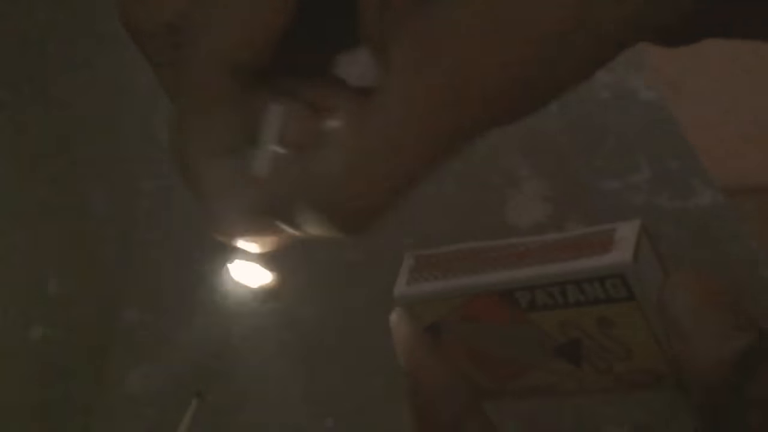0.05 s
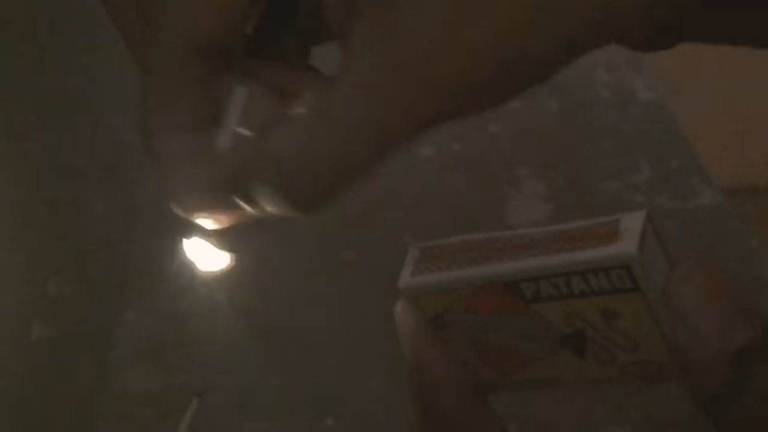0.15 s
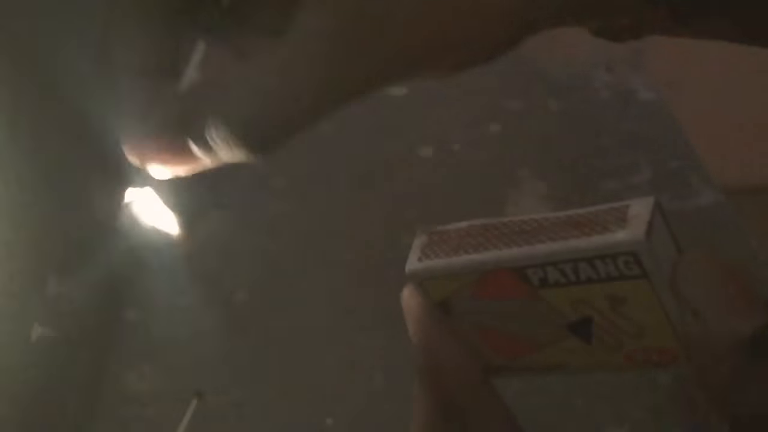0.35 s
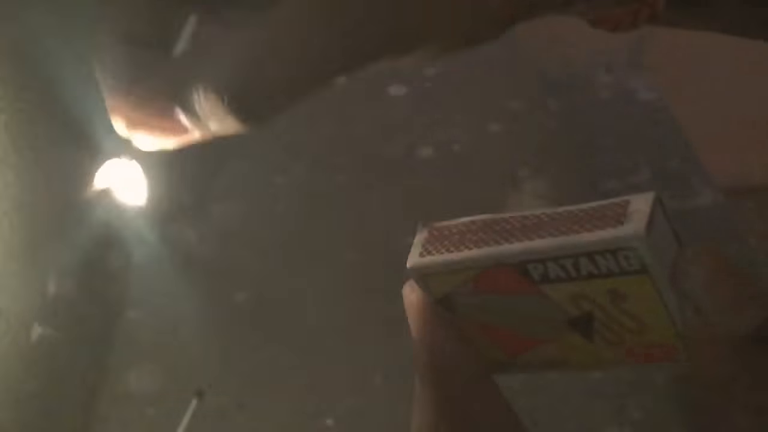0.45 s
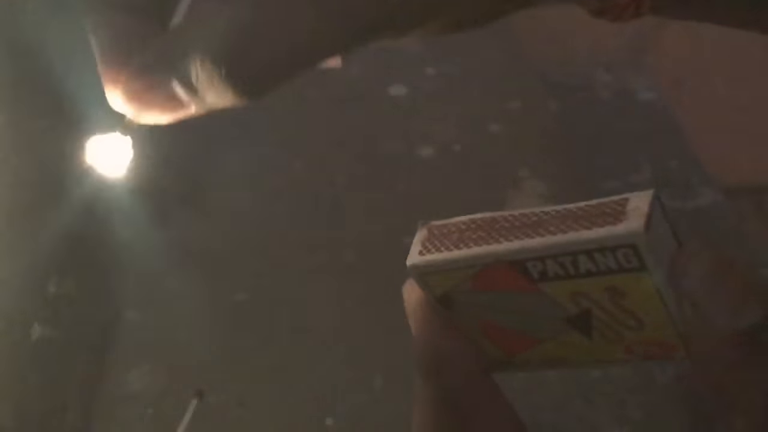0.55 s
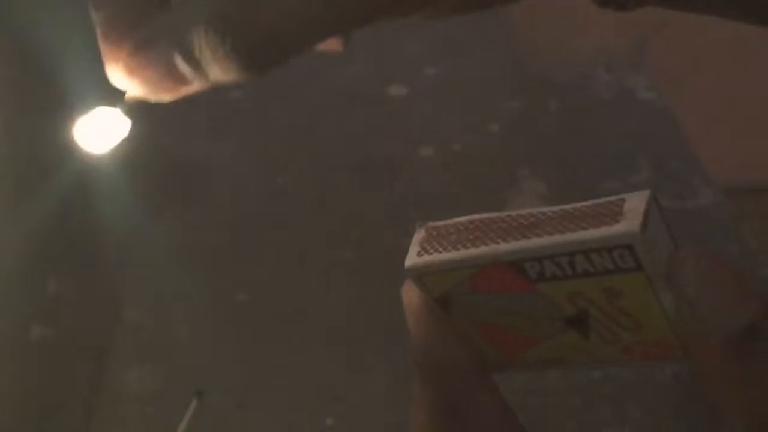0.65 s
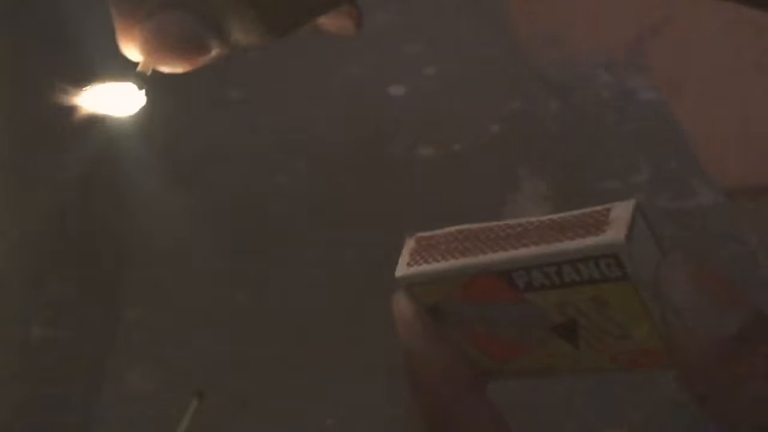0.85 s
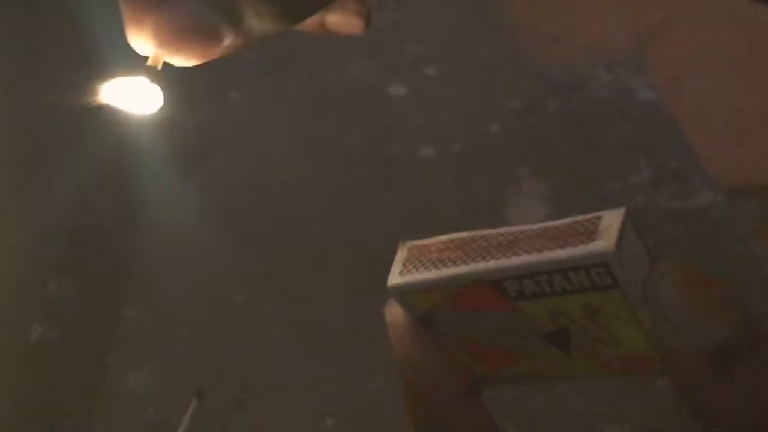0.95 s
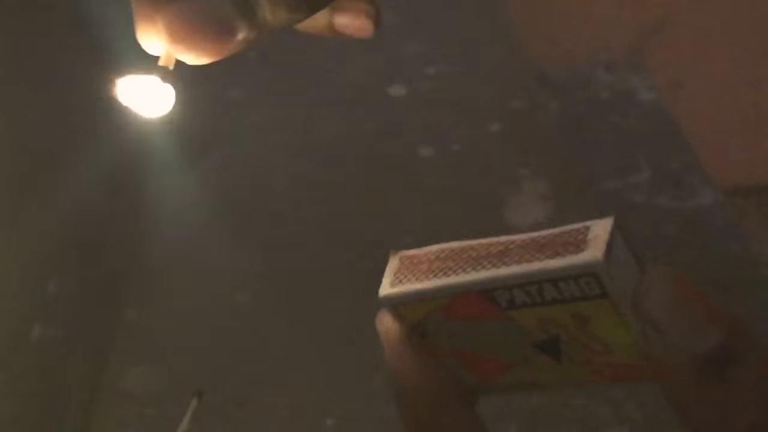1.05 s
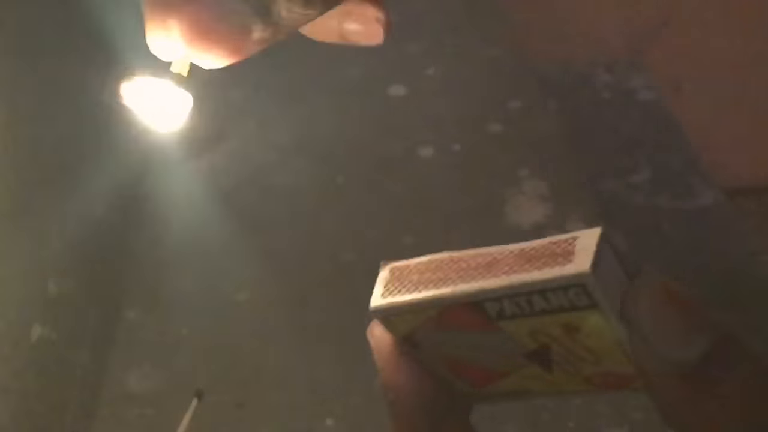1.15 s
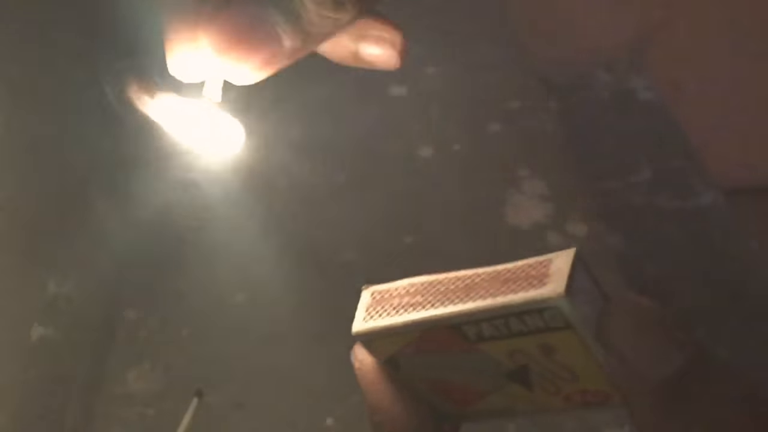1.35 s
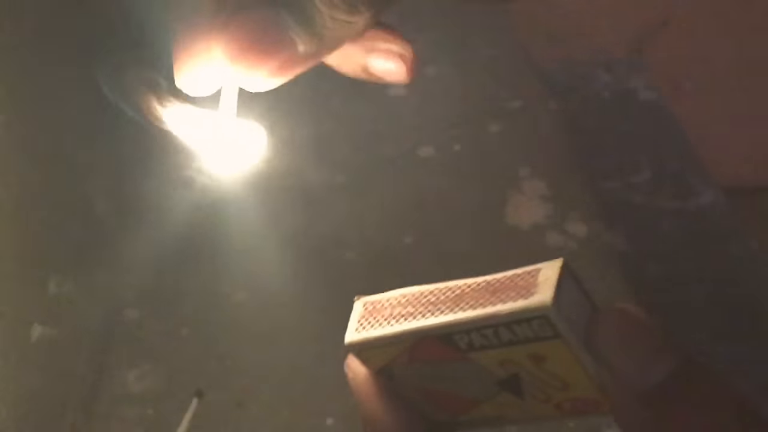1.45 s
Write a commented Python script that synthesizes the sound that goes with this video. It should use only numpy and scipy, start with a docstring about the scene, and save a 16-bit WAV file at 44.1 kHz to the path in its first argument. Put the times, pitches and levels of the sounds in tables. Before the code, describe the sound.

A match catches with a faint fizz, cracks twice and sputters into flame. Its hiss fades over a low flutter of burning. The sound is close and muffled, in a small, quiet room.

```python
"""In a small, quiet room, a match head catches close to the microphone.
It fizzes, cracks once and sputters, then bursts into flame with a second crack and a puff of gas.
The escaping gas hisses, whistles for a moment and dies down; the flame flutters over the rumble
of rising hot air. The recorder is very dull, and the two main cracks overload it."""
import sys
import numpy as np
from scipy import signal
from scipy.fft import rfft, irfft
from scipy.io import wavfile
from scipy.ndimage import uniform_filter1d

SR = 44100
rng = np.random.default_rng(int(sys.argv[2]) if len(sys.argv) > 2 else 0)


def master_out(mix):
    """Clip the mix to full scale and print it as 16-bit PCM to the path in sys.argv[1]."""
    frames = np.transpose(np.atleast_2d(mix))
    ceiling = np.clip(frames, -1, 1)
    pcm = np.round(ceiling * 32767).astype(np.int16)
    wavfile.write(sys.argv[1], SR, pcm)


N = 66150
TIME = np.arange(N) / SR


def cracks():
    """Pieces of the match head burst with sharp snaps that have little bass or treble."""
    # one snap a row: t/s, level/dB, f/Hz, cycles until it has died away
    snaps = [(.2274, 7, 1321, 2.18), (.2630, -15, 988, 5.1), (.2794, -26.5, 1210, 3),
             (.2835, -9.5, 1050, 4.6), (.2949, -0.5, 1160, 2), (.3042, -16.5, 1500, 4),
             (.3147, -12.5, 1400, 4), (.3395, -7.5, 1297, 1.2), (.3455, 2, 734, 2.87),
             (.3485, -4.5, 960, 4.6), (.3510, -27.5, 1520, 3.8), (.3567, -17.5, 1070, 5),
             (.3642, -11, 1094, 12), (.3757, -2, 1510, 2.7), (.3919, 1.5, 1313, 1.9),
             (.4042, -15, 1200, 3.4), (.4157, -5.5, 880, 1.3), (.4288, -6, 918, 1.6),
             (.4355, -17, 1100, 2.5), (.4470, -17, 862, 1.6), (.8215, -20.5, 694, 2.1)]
    low_cut_hz, high_cut_hz = 540.4, 1706
    thin = signal.sosfilt(signal.butter(2, low_cut_hz, "high", fs=SR, output="sos"), bursts(snaps))
    return signal.sosfilt(signal.butter(6, high_cut_hz, fs=SR, output="sos"), thin)


def puffs():
    """Gas puffs out of the flame in short, low thumps."""
    # one puff a row: t/s, level/dB, f/Hz
    thumps = [(0.2288, -19, 140), (0.3456, -8.5, 161), (0.3464, -10.5, 376), (.3520, -7, 130),
              (.3600, -8.5, 43.9), (0.387, -16.5, 123), (0.438, -13.5, 137), (.4510, -19, 159),
              (.4580, -19, 168), (0.8231, -22.5, 220), (0.8577, -23, 174.5), (0.9456, -28.5, 190),
              (0.961, -29.5, 306), (1.133, -29, 225), (1.3336, -30.5, 219), (1.343, -31.5, 45)]
    cycles = 1.8   # until a puff has died away
    return bursts([(*thump, cycles) for thump in thumps])


def sputter():
    """Countless tiny pops come at random while the head burns through."""
    # how loud the sputter is: t/s, level/dB
    loudness = [(.21, -49), (.232, -13), (.255, -32), (.285, -25.5), (.325, -29), (.35, -8), (.385, -18),
                (.44, -28), (.475, -33.5), (.8, -43.5), (1.2, -74)]
    # its tone colour: f/Hz, level/dB
    colour = [(60, -16.5), (300, -1.5), (500, -2), (800, 0.5), (1100, -5.5), (1700, 0), (2000, -8.5),
              (2300, -10)]
    pops_per_s = 1800
    pops = rng.random(N) < pops_per_s / SR
    signs = rng.choice([-1, 1], N)
    return level(loudness) * coloured(pops * signs, colour)


def flare():
    """Gas hisses off the head, and sounds duller as it weakens."""
    # how loud the hiss is: t/s, level/dB
    loudness = [(.2, -63), (.25, -35.5), (.47, -32.5), (.58, -35.5), (.75, -37.5), (.88, -39.5),
                (.96, -39.5), (1.12, -43), (1.2, -45), (1.3, -47), (1.42, -43.5), (1.5, -43.5)]
    # its tone colour: f/Hz, level/dB
    colour = [(100, -1.5), (300, -12.5), (450, 0), (600, 1), (780, 3.5), (1050, 1.5), (1300, -3.5),
              (1650, -0.5), (2000, -9.5), (2300, -12)]
    treble_from_hz, dulling = 1301, 0.87
    hiss, strength = noise(colour), level(loudness)
    body = signal.sosfiltfilt(signal.butter(2, treble_from_hz, fs=SR, output="sos"), hiss)
    treble = (hiss - body) * (strength / strength.max()) ** dulling   # fades faster than the body
    return strength * (body + treble)


def flame():
    """The flame flutters above the rumble of the hot air that rises from it."""
    # how loud the flutter is: t/s, level/dB
    flutter_loudness = [(0, -26.5), (.04, -43.5), (.1, -35.5), (.2, -41.5), (.3, -33.5), (.36, -39),
                        (.44, -33.5), (.5, -33.5), (.7, -39), (.85, -43), (1.05, -40.5), (1.15, -48),
                        (1.21, -44.5), (1.3, -47), (1.35, -46.5), (1.5, -46.5)]
    # its tone colour: f/Hz, level/dB
    flutter_colour = [(40, -18.5), (85, -4.5), (125, -4.5), (175, 3.5), (215, -4.5), (300, -3.5),
                      (380, -12), (600, -37), (1500, -51.5)]
    # how loud the rising air is: t/s, level/dB
    draught_loudness = [(0, -50), (.335, -46), (.365, -23), (.40, -32), (.45, -31), (.52, -42), (.66, -40),
                        (.77, -33), (.9, -42), (.97, -38), (1.05, -35), (1.17, -39), (1.25, -52),
                        (1.31, -50), (1.36, -38), (1.5, -43)]
    # its tone colour: f/Hz, level/dB
    draught_colour = [(10, -26.5), (22, -2), (34, -2.5), (48, -11.5), (70, -16), (100, -50.5), (250, -56),
                      (600, -67.5)]
    flutter = level(flutter_loudness) * evened(noise(flutter_colour))
    draught = level(draught_loudness) * evened(noise(draught_colour))
    return flutter + draught


def fizz():
    """The glowing head fizzes thinly until it cracks."""
    # how loud the fizz is: t/s, level/dB
    loudness = [(0, -71), (.03, -60), (.065, -45), (.15, -43), (.19, -44.5), (.225, -39), (.26, -50.5),
                (.3, -86)]
    # its tone colour: f/Hz, level/dB
    colour = [(300, -4.5), (500, -6), (820, -7.5), (1020, 1), (1200, -2), (1350, -13), (1700, -8),
              (2000, -23.5), (2300, -18)]
    return level(loudness) * noise(colour)


def whistle():
    """A jet of escaping gas finds a pitch and whistles faintly for a moment."""
    peak_s, fade_s, pitch_hz, width_hz, peak_db = 0.96, 0.035, 1009, 62, -43
    decay = np.exp(-np.pi * width_hz / SR)
    ring = ringing_filter(pitch_hz, decay)
    breathy = signal.lfilter([1], ring, rng.standard_normal(N))
    tone = signal.lfilter([1], ring, breathy)   # a second pass makes the pitch clearer
    swell = np.exp(-((TIME - peak_s) / fade_s) ** 2)
    return from_db(peak_db) * rms_one(tone) * swell


def reflections(sound):
    """Add an echo off the nearest surface and a short wash of echoes from the rest of the room."""
    echo_s, echo_db = 0.002806, -4.5
    wash_s, wash_db = 0.069, -7   # the wash falls by 60 dB in wash_s
    echo = np.interp(TIME - echo_s, TIME, sound)
    fade = from_db(-60 * np.minimum(TIME / wash_s, 10))
    tail = rng.standard_normal(N) * fade * (TIME > echo_s)
    wash = signal.fftconvolve(sound, tail / np.linalg.norm(tail))[:N]
    return sound + from_db(echo_db) * echo + from_db(wash_db) * wash


def room_ringing(sound):
    """The surroundings ring on at a few pitches of their own."""
    # one ringing pitch a row: f/Hz, level/dB, time to fall by 60 dB/s
    room_tones = [(310.5, 1, 0.092), (746, 5.5, 0.75), (1032, -8, 0.37), (1139, -5, 0.053), (1223, -3, .2),
                  (1392, -4, 0.074), (1640, -1.5, 0.59), (1935, -5, 0.053)]
    out = sound
    for hz, db, ring_s in room_tones:
        decay = from_db(-60 / (ring_s * SR))
        ring = signal.lfilter([1, 0, -1], ringing_filter(hz, decay), sound)
        out = out + from_db(db) * (1 - decay ** 2) / 2 * ring
    return out


def bursts(rows):
    """Each burst is a swing of air pressure that swells at once and dies within a few cycles."""
    out = np.zeros(N)
    for start_s, db, hz, cycles in rows:
        turns = np.clip((TIME - start_s) * hz, 0, 20)
        swing = np.sin(2 * np.pi * turns) * np.sqrt(turns) * from_db(-60 * turns / cycles)
        out += from_db(db) * swing / np.abs(swing).max()
    return out


def noise(colour):
    """The steady rush of swirling gas, with the given tone colour."""
    return coloured(rng.standard_normal(N), colour)


def coloured(sound, colour):
    """Shape a sound's lows and highs by rows of f/Hz, level/dB; its average power becomes one."""
    hz, db = np.transpose(colour)
    all_hz = np.maximum(np.fft.rfftfreq(N, 1 / SR), 1)
    gains = from_db(np.interp(np.log(all_hz), np.log(hz), db))
    return rms_one(irfft(rfft(sound) * gains, N))


def evened(rumble, window_s=0.06):
    """Take the slow swells out of a rumble."""
    power = uniform_filter1d(rumble ** 2, int(window_s * SR), mode="wrap")
    return rumble / np.sqrt(power + 1e-9)


def ringing_filter(hz, decay):
    """Feedback weights for a filter that rings at hz and shrinks by the factor decay each sample."""
    return [1, -2 * decay * np.cos(2 * np.pi * hz / SR), decay ** 2]


def level(curve):
    """Join rows of t/s, level/dB into a volume factor for every sample."""
    return from_db(np.interp(TIME, *np.transpose(curve)))


def from_db(db):
    """Turn decibels into a volume factor."""
    return 10 ** (np.asarray(db) / 20)


def rms_one(sound):
    """Scale a sound to an average power of one."""
    return sound / np.sqrt(np.mean(sound ** 2) + 1e-20)


def scene():
    """Cracks, puffs, sputter and flare ring in the room; the low flame, whistle and fizz lie beneath."""
    match = reflections(cracks()) - puffs() + sputter() + flare()   # minus: puffs swing down first
    return (room_ringing(match) + flame() + whistle() + fizz())[None]


def record(dry):
    """A very dull recorder loses the treble and chops off the loudest peaks."""
    low_cut_hz, high_cut_hz, top_hz = 5.3, 2340, 16000
    thinned = signal.sosfilt(signal.butter(2, low_cut_hz, "high", fs=SR, output="sos"), dry)
    treble_cut = signal.firwin(2001, high_cut_hz, window=("kaiser", 8), fs=SR)
    dull = signal.fftconvolve(thinned, treble_cut[None], "same")
    overloaded = np.clip(dull, -1, 1)   # adds new treble, which is then cut above top_hz
    return signal.sosfilt(signal.cheby2(12, 70, top_hz, fs=SR, output="sos"), overloaded)


dry = scene()
out = record(dry)
master_out(out)
```